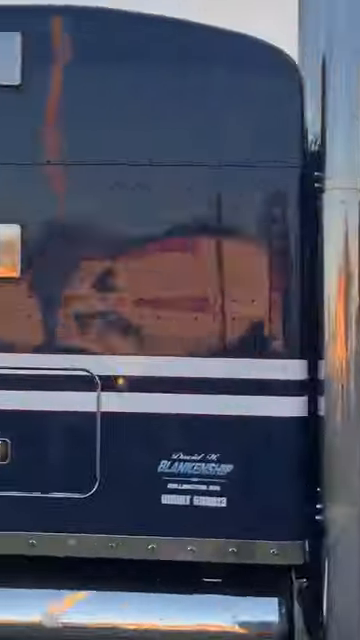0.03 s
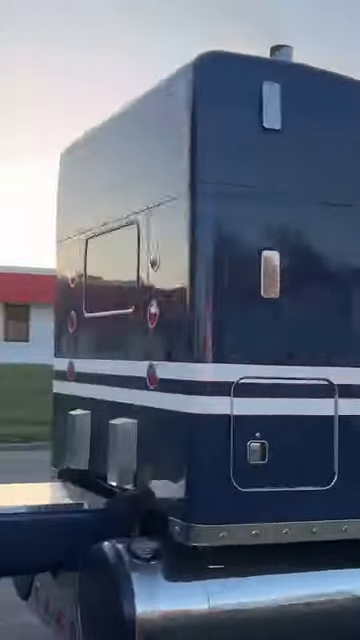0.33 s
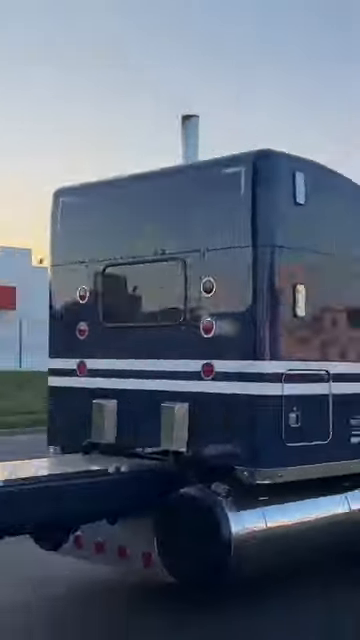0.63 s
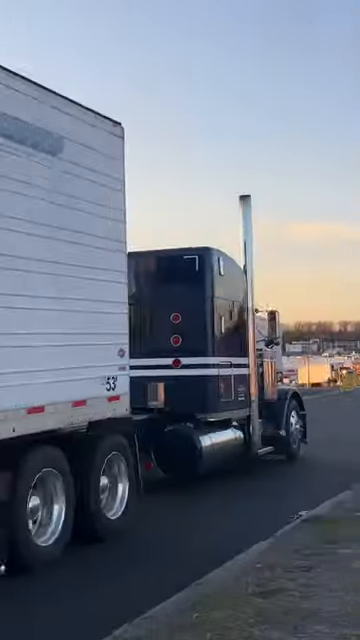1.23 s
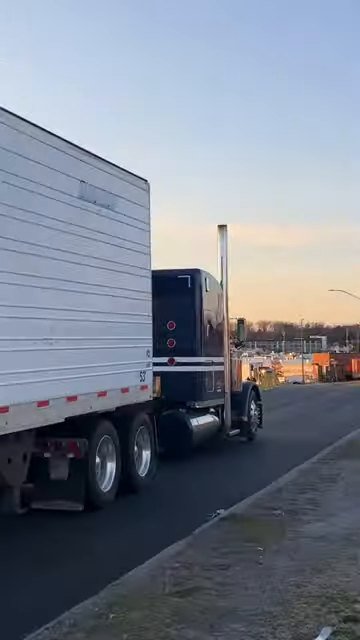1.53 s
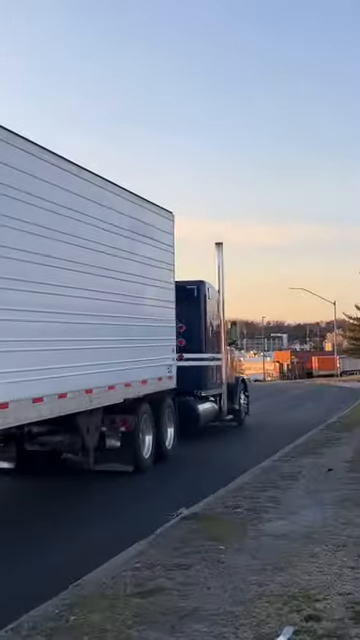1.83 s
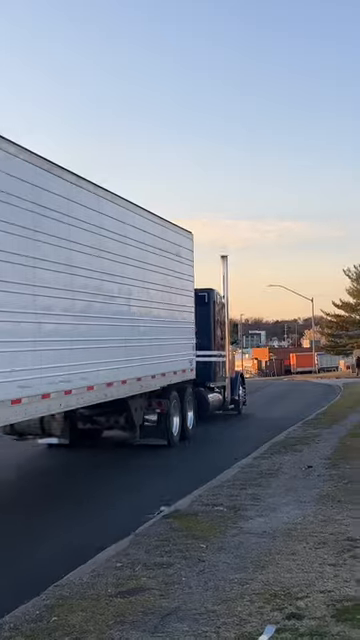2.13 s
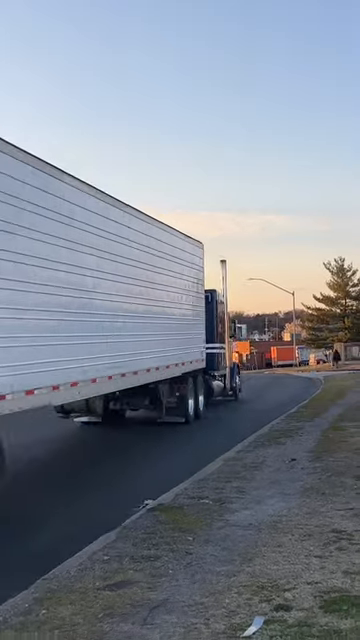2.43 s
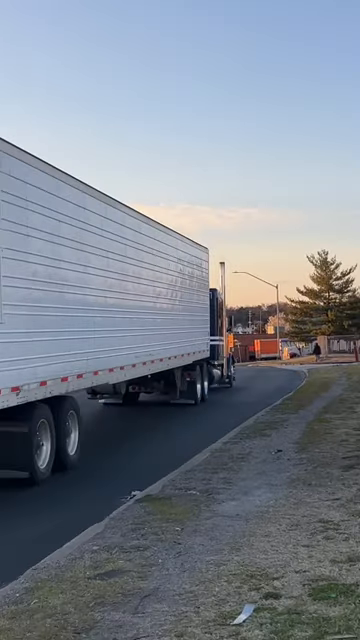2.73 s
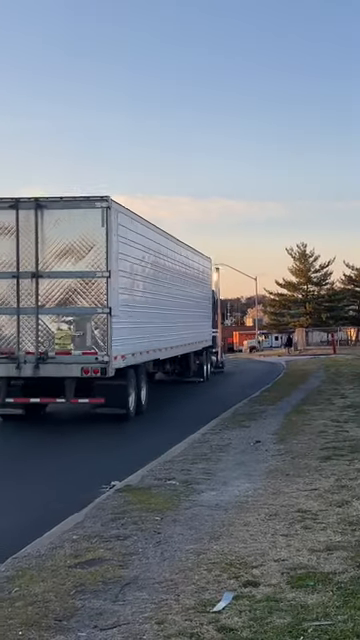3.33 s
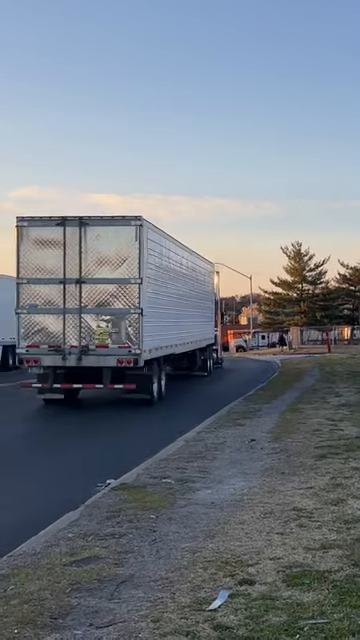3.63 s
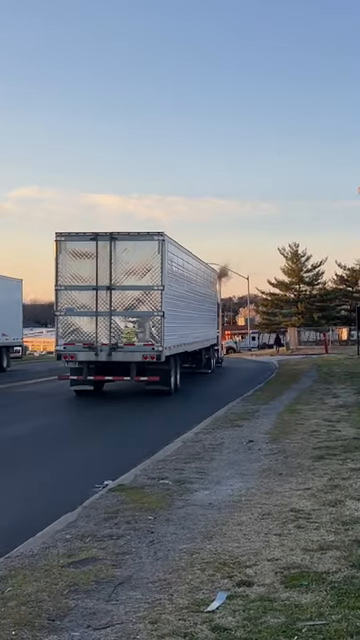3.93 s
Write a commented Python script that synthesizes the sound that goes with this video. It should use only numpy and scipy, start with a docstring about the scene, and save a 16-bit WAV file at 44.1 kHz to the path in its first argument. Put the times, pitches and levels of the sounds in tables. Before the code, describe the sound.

A diesel truck passes close and pulls away, trailer rattling, then its engine brake hammers.

```python
"""A diesel truck passes by.

A six-cylinder truck pulls away, its engine pulsing through open exhaust stacks.
The trailer rolls past with rumbling tyres and steel fittings that rattle at each jolt.
Then the engine brake hammers compressed air out of the stacks, led by two cylinders at first."""
import sys
import numpy as np
from scipy import signal
from scipy.fft import rfft, irfft
from scipy.io import wavfile
from scipy.ndimage import uniform_filter1d

SR = 44100
rng = np.random.default_rng(int(sys.argv[2]) if len(sys.argv) > 2 else 0)


def digitize_waveform(pressure):
    """Quantize a signal to 16-bit integers and store it at the path in sys.argv[1].

    Rows of a 2-D input are taken as channels; values are limited to [-1, 1].
    """
    field = np.atleast_2d(pressure).T
    bounded = np.clip(field, -1, 1)
    quanta = np.round(bounded * 32767).astype(np.int16)
    wavfile.write(sys.argv[1], SR, quanta)


N = 176400
T, HZ = np.arange(N) / SR, np.fft.rfftfreq(N, 1 / SR)

# The pulling engine. Each row: time in seconds, then pulse, hum and clatter gains in dB.
ENGINE_LEVELS = [(0, -16, -23, -25.5), (.1, -22.5, -19.5, -22.5), (.4, -37, -26, -28),
                 (.68, -44, -30.5, -35.5), (1.05, -54, -39.5, -56), (1.9, -61, -49.5, -80)]
# Tone colours of pipe and clatter. Each row: frequency in Hz, relative level in dB.
PIPE_COLOUR = [(100, -20.5), (400, 1.5), (720, -2.5), (860, -12.5), (1100, -1.5), (1700, -10), (6000, -40)]
CLATTER_COLOUR = [(30, -29), (60, 8), (400, 0.5), (1500, -4), (3200, -15.5), (5200, -18.5), (8000, -47)]
# Firing strengths in dB, used twice in each engine cycle.
CYLINDER_DB = [2, -1.5, 0]
# Engine tones. Each row: multiple of the firing rate, starting dB above the hum gain.
HUM_TONES = [(1, -1), (2, 4), (3, -2), (3.55, -4), (4, 5), (4.67, 0.5), (5.67, -9), (9.36, -5)]

# Engine speed while braking. Each row: time in seconds, firings per second.
BRAKE_SPEED = [(3.11, 77), (3.2, 71), (3.5, 73.4), (3.65, 72), (4, 71.1)]
# The brake. Each row: time in seconds, then blast and crackle gains in dB.
BRAKE_LEVELS = [(3.11, -32.5, -68), (3.18, -22.5, -44.5), (3.36, -22, -41.5), (3.61, -25, -43),
                (3.73, -29.5, -48.5), (4, -28.5, -48.5)]
# Tone colours of blast and crackle. Each row: frequency in Hz, relative level in dB.
BLAST_COLOUR = [(40, -17.5), (190, 0), (310, -2.5), (480, 1.5), (650, 3), (830, -8), (1100, -6),
                (2200, -14.5), (6000, -69)]
CRACKLE_COLOUR = [(3000, -2.5), (4600, 2.5), (6800, -11), (8300, -22), (12500, -20)]
# Booming stacks. Each row: multiple of the firing rate, dB at first, dB once settled.
BOOM_TONES = [(1, -37, -33.5), (1.67, -39, -31.5), (2, -33, -31), (2.67, -32, -43), (3, -24.5, -33),
              (6, -33, -43)]
# Times in seconds when a firing cracks harder.
HARD_CRACKS = [3.387, 3.551, 3.607, 3.773]

# The tyres. Each row: time in seconds, then rumble, roar and hiss levels in dB.
TYRE_LEVELS = [(0, -21.5, -22, -31.5), (.6, -36, -39.5, -44.5), (1.35, -35.5, -37, -46),
               (1.7, -38, -39.5, -51.5), (2.03, -36, -40.5, -46), (2.68, -38.5, -41, -48.5),
               (2.8, -44.5, -43.5, -56), (3.2, -59, -44, -58.5)]
# Their tone colours. Each row: frequency in Hz, relative level in dB.
RUMBLE_COLOUR = [(22, -41), (48, 0.5), (170, -1.5), (450, -14.5), (2500, -64)]
ROAR_COLOUR = [(120, -13.5), (620, -0.5), (900, -7), (1200, -3.5), (1900, -11), (7000, -55)]
HISS_COLOUR = [(900, 7), (2500, 0), (5400, -2), (8200, -16.5), (9700, -10.5), (13000, -10), (15000, -42)]
# Trailer jolts. Each row: start in seconds, then rattle and clank gains in dB.
JOLTS = [(1.942, -51, -33), (2.027, -39, -26.5), (2.062, -41, -29), (2.28, -45.5, -41.5),
         (2.365, -44.5, -42), (2.435, -45, -51), (2.597, -45, -52), (2.662, -43.5, -47)]
# Ringing pitches of the fittings and the frame, in Hz.
STEEL_HZ = [3270, 4630, 5860, 10600, 12000]
FRAME_HZ = [2510, 2640, 2790, 3100]
# A loose link is struck. Each row: start in seconds, gain in dB.
CLINKS = [(2.663, -37), (2.72, -30.5)]
# Its tones. Each row: pitch in Hz, relative level in dB, seconds to fade by 60 dB.
LINK_TONES = [(4460, 0.5, 0.059), (8740, -17.5, 0.078)]
# Whining parts. Each row: time when nearest and swell width in seconds, pitch and width in Hz, dB.
WHINES = [(.93, 0.15, 9900, 1380, -60), (1.98, 0.18, 2660, 700, -47.5), (2.65, 0.34, 5820, 220, -65)]

# How alike left and right are. Each row: frequency in Hz, likeness from 0 to 1.
LIKENESS = [(200, 0.83), (650, 1), (2800, 0), (13000, 0.4)]
ROAD_LIKENESS = [(220, 0.84), (1400, 0.023)]
# Outdoor echoes. Each row: frequency in Hz, seconds to fade by 60 dB.
ECHO_FADE = [(600, 0.79), (10000, 0.13)]


def engine(firing_hz=76.75, dulling_db=13, road_echo_s=.005):
    """Firing cylinders make exhaust pulses, hum and clatter."""
    turns = firing_hz * T - 1 / 4  # counts firings
    pulse_db, hum_db, clatter_db = curves(ENGINE_LEVELS)
    clicks = firings(turns, CYLINDER_DB)
    # As the stacks move away, tones lose dulling_db per second for each octave up.
    hum = sum(tone(k * turns, hum_db + db - dulling_db * np.log2(k) * T) for k, db in HUM_TONES)
    exhaust = amp(pulse_db) * colour(clicks, PIPE_COLOUR)[0]
    road_echo = .62 * np.interp(T - road_echo_s / (1 + T), T, exhaust)  # closes in as the cab leaves
    clatter = amp(clatter_db + 2 * drift(20)) * colour(puffs(clicks, .005, steady=1), CLATTER_COLOUR)
    return .5 * outdoors((exhaust + road_echo)[None], wet_db=0) + clatter + hum


def engine_brake(start_s=3.1105, all_cylinders_s=3.5, settle_s=3.537):
    """Each cylinder dumps its compressed air with a blast, a puff and a crackle; the stacks boom."""
    turns = np.cumsum(curves(BRAKE_SPEED)[0] * (T >= start_s)) / SR
    blast_db, crackle_db = curves(BRAKE_LEVELS)
    surge = np.cos(2 * np.pi * (turns - 1) / 6)  # one swell per engine cycle
    clicks = firings(np.ceil(turns), [0]) * amp(.7 * surge)
    for s in HARD_CRACKS:
        clicks *= amp(4 * (abs(T - s) < 1 / 200))
    engaged = (T > all_cylinders_s) | (np.round(turns) % 3 == 0)  # two of the six lead
    clicks *= np.where(engaged, 1, amp(-9))
    blast = -colour(clicks, BLAST_COLOUR) * amp(-5.5)
    gas = colour(puffs(clicks, decay_s=.0045, steady=.25), BLAST_COLOUR) * amp(-2.5)
    crackle = colour(puffs(clicks * amp(2.3 * surge), decay_s=.0045, steady=.22), CRACKLE_COLOUR)
    settled = np.clip((T - settle_s) / .15 + .5, 0, 1)
    boom = sum(tone(k * turns + .5, first + (then - first) * settled) for k, first, then in BOOM_TONES)
    boom *= np.clip((T - start_s) / .16, 0, 1) ** 2  # fades in
    stacks = amp(blast_db) * (blast + gas) + amp(crackle_db) * crackle * amp([[2], [-2]])
    return outdoors(stacks * (T >= start_s), wet_db=-6.5) + boom


def tyres():
    """Rolling tyres rumble, roar and hiss, swelling with the bumps."""
    rumble_db, roar_db, hiss_db = curves(TYRE_LEVELS)
    bumps = drift(26)
    rumble = amp(rumble_db + 2.4 * bumps) * colour(noise(ROAD_LIKENESS), RUMBLE_COLOUR)
    roar = amp(roar_db + bumps + drift(41)) * colour(noise(ROAD_LIKENESS), ROAR_COLOUR)
    hiss = amp(hiss_db + .5 * bumps) * colour(noise(), HISS_COLOUR)
    return rumble + roar + hiss


def fittings(rise_s=.003, fade_s=.09, chatter_start_s=1.73, taps_per_s=60):
    """Jolts rattle the fittings and clank the frame; a link rings and small parts chatter."""
    out, t = np.zeros((2, N)), T[:SR // 2]
    scrape = colour(noise(), HISS_COLOUR)
    rise = np.minimum(t / rise_s, 1)
    shape = rise * amp(-60 * t / fade_s)
    size = np.sqrt(np.mean(shape ** 2))
    lean_left = amp([[2], [-2]])
    for s, rattle_db, clank_db in JOLTS:
        contacts = rng.standard_normal((2, len(t))) * shape
        rattle = size * ring(contacts, STEEL_HZ) * lean_left
        rattle += 1.9 * shape * scrape[:, round(s * SR):][:, :len(t)]
        clank = size * ring(contacts * shape, FRAME_HZ) / lean_left
        add(out, s, amp(rattle_db) * rattle + amp(clank_db) * clank)
    for s, db in CLINKS:
        clink = sum(amp(db + level - 60 * t / fade) * np.sin(2 * np.pi * hz * t)
                    for hz, level, fade in LINK_TONES)
        add(out, s, clink * rise * lean_left)
    taps = rng.random(N) * (rng.random(N) < taps_per_s / SR) * (T > chatter_start_s)
    chatter = unit(scrape * signal.fftconvolve(taps, shape ** 2)[:N])
    hiss_db = curves(TYRE_LEVELS)[2]
    return out + amp(hiss_db) * .5 * (chatter + .5 * ring(chatter, STEEL_HZ))


def whines():
    """Parts of the running gear go by, each a narrow band of noise that swells and flutters."""
    out = np.zeros((2, N))
    for s, length, hz, width, db in WHINES:
        band = unit(irfft(rfft(noise()) / (1 + (2 * (HZ - hz) / width) ** 2), N))
        swell = np.exp(-.5 * ((T - s) / length) ** 2)
        out += band * amp(db + 2 * drift(18)) * swell
    return out


def outdoors(x, wet_db):
    """Adds scattered echoes from road, trailer and trees."""
    taps = rng.standard_normal((2, SR // 2)) * (rng.random((2, SR // 2)) < 2000 / SR)
    taps[:, :SR // 300] = 0  # gap before the first echo
    hz, t, spectra = signal.stft(taps, SR, nperseg=256)
    tail = signal.istft(spectra * amp(-60 * t / read(ECHO_FADE, hz)[:, None]), SR, nperseg=256)[1]
    lowpass = signal.butter(1, 900, fs=SR, output="sos")
    tail[1] += signal.sosfilt(lowpass, tail[0] - tail[1])  # bass is alike on both sides
    return x + amp(wet_db) * signal.fftconvolve(x, tail / np.linalg.norm(tail[0]), axes=1)[:, :N]


def firings(turns, cylinder_db):
    """One click per firing, each cylinder at its own strength."""
    at = np.flatnonzero(np.diff(np.floor(turns)) > 0)
    clicks = np.zeros(N)
    clicks[at] = amp(np.resize(cylinder_db, len(at)) + rng.standard_normal(len(at)))
    return clicks / np.sqrt(np.mean(clicks[at[0]:] ** 2))


def puffs(clicks, decay_s, steady):
    """Gas noise bursts out at each click, over a steady flow."""
    burst = signal.lfilter([1], [1, -np.exp(-1 / (decay_s * SR))], clicks)
    burst = uniform_filter1d(burst, size=64)
    burst /= np.sqrt(np.mean(burst[burst > 0] ** 2))
    return noise() * (burst + steady) / (1 + steady)


def tone(turns, db):
    """A clean, slightly wavering exhaust tone."""
    return amp(db + 1.6 * drift(8)) * np.sqrt(2) * np.cos(2 * np.pi * turns + .27 * drift(8))


def ring(contacts, pitches, fade_s=.12):
    """Struck steel rings, never quite at the same pitch; higher tones are weaker."""
    t, tail = T[:SR // 2], 0
    for hz in pitches:
        detune = 1 + rng.standard_normal() / 100
        tail += amp(-60 * t / fade_s) / np.sqrt(hz) * np.sin(2 * np.pi * hz * detune * t)
    return unit(signal.fftconvolve(contacts, tail[None], axes=1)[:, :contacts.shape[1]])


def colour(x, spectrum, size=4096):
    """Gives a sound a tone colour, with a filter that rings only after each hit."""
    gains = amp(read(spectrum, np.fft.rfftfreq(2 * size, 1 / SR)))
    cepstrum = irfft(np.log(gains))
    cepstrum[1:size] *= 2
    cepstrum[size + 1:] = 0
    taps = irfft(np.exp(rfft(cepstrum)))[:size]
    return signal.oaconvolve(np.atleast_2d(x), taps[None] / np.linalg.norm(taps), axes=1)[:, :N]


def noise(likeness=LIKENESS):
    """White noise, partly alike on the left and right."""
    left, other = rfft(rng.standard_normal((2, N)))
    share = np.clip(read(likeness), -1, 1)
    return irfft(np.array([left, share * left + np.sqrt(1 - share ** 2) * other]), N)


def drift(hz):
    """Slow random movement of typical size 1."""
    return unit(irfft(rfft(rng.standard_normal(N)) * np.exp(-(HZ / hz) ** 2) * (HZ > 0), N))


def amp(db):
    """Turns decibels into gain."""
    return 10 ** (np.asarray(db) / 20)


def unit(x):
    """Scales to an average power of 1."""
    return x / np.sqrt(np.mean(x ** 2) + 1e-20)


def curves(table):
    """Turns each column of a time table into a curve."""
    s, *columns = np.transpose(table)
    return [np.interp(T, s, c) for c in columns]


def read(points, hz=HZ):
    """Reads between the rows of a frequency table."""
    f, value = np.transpose(points)
    return np.interp(np.log(hz + 1), np.log(f + 1), value)


def add(mix, s, sound):
    """Mixes a sound in at s seconds."""
    part = mix[..., round(s * SR):][..., :sound.shape[-1]]
    part += sound[..., :part.shape[-1]]


def scene():
    """The whole truck and trailer."""
    return engine() + tyres() + whines() + fittings() + engine_brake()


def record(dry, top_hz=14300):
    """Rounds off the highest peaks and cuts the top treble."""
    soft = dry / (1 + (dry / .95) ** 8) ** (1 / 8)
    lowpass = signal.firwin(301, top_hz, window=("kaiser", 8), fs=SR)
    return signal.oaconvolve(soft, lowpass[None], "same")


dry = scene()
out = record(dry)
digitize_waveform(out)
```